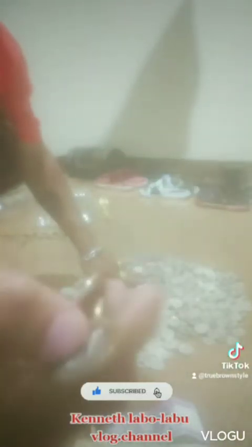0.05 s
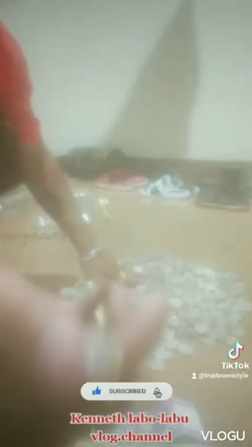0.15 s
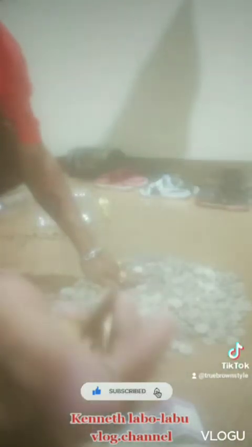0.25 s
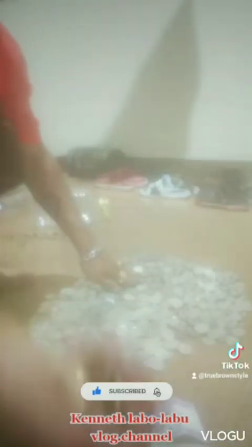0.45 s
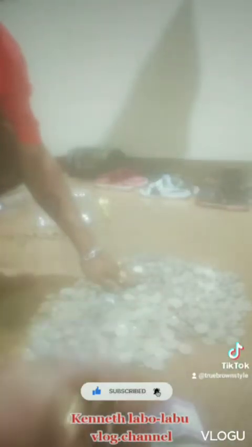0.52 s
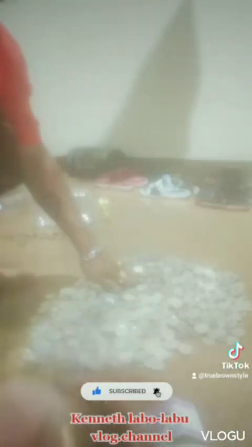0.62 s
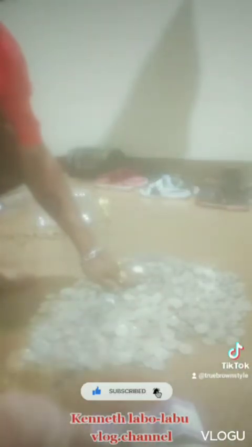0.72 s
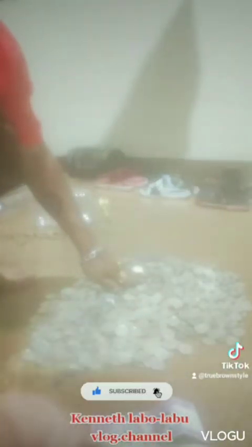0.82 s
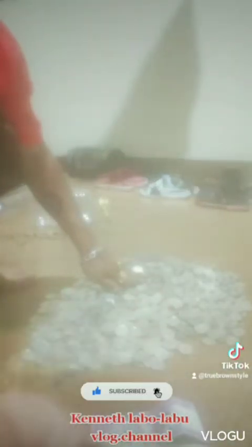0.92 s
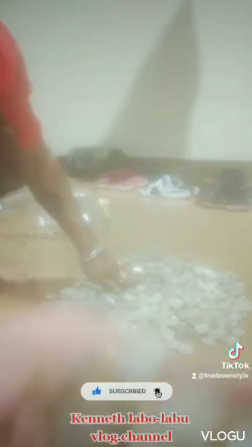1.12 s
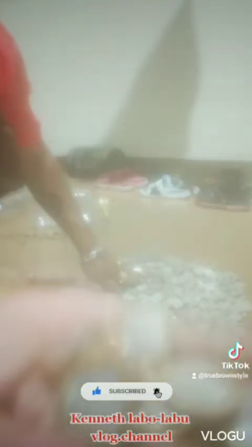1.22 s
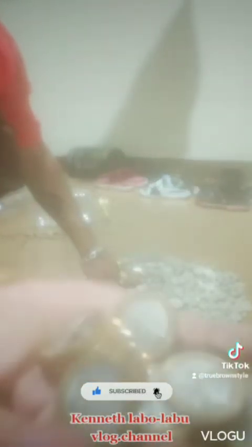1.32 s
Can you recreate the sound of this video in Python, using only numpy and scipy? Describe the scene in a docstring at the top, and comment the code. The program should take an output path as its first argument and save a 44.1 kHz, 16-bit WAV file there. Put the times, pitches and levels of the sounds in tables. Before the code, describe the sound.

Coins clink and slide as they drop onto a large heap in a quick, bright run. After a brief pause a few more land softly. The small room is heard close up, with a faint hiss.

```python
"""Coins dropped on a heap

Coins are picked from a large heap on the floor of a small hard room and let fall back onto it.
Each impact is a sharp tick that excites the damped modes of the coins around it. Sliding coins
chatter, loose coins ring in free vibration, and two landings thud faintly through the heap.
The room reverberates, and hums and hisses quietly."""
import sys
import numpy as np
from scipy import signal
from scipy.fft import rfft, irfft, next_fast_len
from scipy.io import wavfile

SR = 44100
rng = np.random.default_rng(int(sys.argv[2]) if len(sys.argv) > 2 else 0)


def log_audio(samples):
    """Write samples as a 16-bit WAV file to the path given in sys.argv[1]."""
    # one column per channel
    frames = np.atleast_2d(samples).T
    # limit to full scale, then quantise
    limited = np.clip(frames, -1, 1)
    pcm = np.round(limited * 32767).astype(np.int16)
    wavfile.write(sys.argv[1], SR, pcm)


N = 59535
TIME = np.arange(N) / SR
LOW_MID_HZ, TREBLE_HZ = (1320, 4060), 8370

# Impacts of coin on coin: t/s, level/dB, treble gain/dB, low-mid gain/dB, shaking of the heap/dB
IMPACTS = [ (0.195, -36, -5, 4, 6), (0.2328, -32, -1, -8, 9), (0.239, 1.5, -0.5, -11, -2),
           (0.2558, -9, 2.5, 0.5, 1), (0.2622, -8.5, -13, -4.5, 1.5), (0.2868, -13.5, -6, -1.5, -3),
           (0.3538, -21.5, -17, 7, -4.5), (0.3650, -17, -8, 3, 4.5), (0.3697, -18.5, -3, 2, 7.5),
           (0.3703, -8.5, 6, 12, -8), (0.3753, -7, 2.5, -10, 2.5), (0.3777, -8.5, 5.5, 10.5, 0.5),
           (0.3818, -2.5, 6, -2, -8), (0.39, -14.5, -3, 5.5, 2.5), (0.4437, -16, -5, 0, -1),
           (0.4466, -4.5, -1, -2.5, -1.5), (0.4553, -11.5, 0, -14, 4), (0.4611, -10, 4, 9, 4),
           (0.4649, -10, -1, 5.5, 3), (0.4701, -16.5, -4, -7, 10), (0.4754, -11.5, -8, 6.5, -2),
           (0.4937, -18, -4, 12, 0), (0.5, -11, 0, -1, -1), (0.5035, -6.5, 4, 6, -1),
           (0.5128, -8.5, 6, 5.5, 2.5), (0.5184, 1, 2, 0, 0.5), (0.5211, -1, 1, -0.5, 2.5),
           (0.5302, -17.5, 10, 5, 4), (0.5330, -8, 3, -3, 3.5), (0.5464, -12, -16, -6, 6.5),
           (0.5474, -6.5, 4, -13, -1.5), (0.5509, -3.5, -3.5, 0.5, 0), (0.5719, -23, 8, -13, 1),
           (0.5902, -23.5, 2, 14, -11), (0.6153, -17.5, -2, 4, -2.5), (0.6213, -16.5, -8, -7, 4.5),
           (0.629, -26, -3, 6, -1), (0.6350, -7.5, -9.5, -9, -1), (0.6636, 5, 6, 2, -9),
           (0.6750, -9, 13, 6, -3.5), (0.677, -15.5, 0, 8, 2), (0.6944, -13.5, -7, -4, 0.5),
           (0.722, -20.5, 2, -11, 0), (0.7393, -22.5, -8, -5.5, 3.5), (0.7537, -20, -21, -5, -8),
           (0.7696, -34.5, 0, -8, 8), (0.7998, -25, -15, -7, -1), (0.8464, -26, -4.5, -8, -1),
           (1.2614, -28, -23, -9, 7), (1.2664, -17.5, -23, -9, 2.5), (1.2715, -19, -9, -5, -2.5),
           (1.2841, -20, 2, -6, 0), (1.3052, -10.5, -15, -16, 4), (1.3156, -9, -5.5, -9, 4.5),
           (1.3348, -24.5, -1, -3, 4)]
# Coins sliding over one another: start/s, end/s, level/dB, low-mid gain/dB
SLIDES = [(0.362, 0.397, -20, 4), (0.458, 0.559, -17, 3.5), (0.59, 0.66, -34, 6.5), (0.692, 0.741, -37, -3),
          (1.26, 1.3, -38, 3)]
# Spectral envelope common to impacts and slides: f/Hz, gain/dB
CONTACT_SPECTRUM = [(200, -38), (700, -23.5), (1200, -19.5), (1600, -10), (2600, -5), (3600, -5.5),
                    (5500, -5.5), (6500, -0.5), (7400, 5), (8600, -6.5), (9900, -14.5), (11300, -2.5),
                    (13000, -4), (15300, -1.5)]
# Modes of freely ringing coins: f/Hz, relative level/dB, T60/s
SMALL_COIN = [(11100, -4, 0.25), (11233, 1, 0.14), (11240, -6, .22)]
LARGE_COIN = [(5830, 3, 0.12), (5660, 3, 0.08), (6580, -13, 0.1), (6580, 10.5, 0.13), (7387, -15, 0.12),
              (7350, -13, 0.11), (14600, -13, .1), (15100, -3, 0.11), (14600, 9.5, .12), (15000, 0, .12)]
# Modes of coins partly damped by fingers or neighbours: f/Hz, relative level/dB, T60/s
PINCHED_COIN = [(1605, -12.5, 0.07), (4400, -5, 0.059), (7360, 4.5, 0.061), (9650, -1.5, 0.039),
                (10800, 8.5, 0.018)]
TILTED_COIN = [(1980, -32, 0.21), (2590, -5, 0.16), (2775, -16, 0.087), (3240, -24, 0.23),
               (7250, -11, 0.098), (7415, -26, .07), (8100, 13, 0.043), (11200, -12, 0.056)]
SETTLING_COIN = [(2830, -3.5, 0.21), (4560, 5.5, .15), (4700, 0, 0.1), (4940, -2.5, 0.082), (6470, -3, .08)]
COIN_STACK = [(885, -9, 0.16), (1031, -4, 0.19), (1130, -5, 0.15), (1558, 3, 0.15), (1690, -8, 0.13)]
FAR_COIN = [(3950, 0.0066, 0.033)]
# Loose coins set ringing: t/s, table of modes, level/dB, treble gain/dB, time left free/s
FREE_VIBRATIONS = [ (0.2389, PINCHED_COIN, -33.5, 1, 0.01), (0.3758, TILTED_COIN, -39, -17, 0.049),
                   (0.457, SMALL_COIN, -36, -2, 0.019), (0.4609, TILTED_COIN, -51, -4, 0.032),
                   (0.481, SMALL_COIN, -40, -1, .014), (0.4940, LARGE_COIN, -44.5, -3, .05),
                   (0.5186, LARGE_COIN, -44, -7, 0.089), (0.4934, COIN_STACK, -54.5, 0, .03),
                   (0.519, COIN_STACK, -49, 0, 0.029), (0.5189, SETTLING_COIN, -45, 0, 0.056),
                   (0.5515, SMALL_COIN, -45.5, -2.5, 0.027), (0.5902, SMALL_COIN, -56.5, -3, .02),
                   (0.6235, SMALL_COIN, -47.5, -2.5, 0.047), (0.6649, SMALL_COIN, -26.5, 0.5, 0.0064),
                   (0.6810, SMALL_COIN, -40, 0, 0.11), (0.7222, SETTLING_COIN, -58.5, 0, 0.019),
                   (0.846, SETTLING_COIN, -70.5, -6, 0.0071), (0.9100, FAR_COIN, -61, -3, .004),
                   (1.2727, SMALL_COIN, -60, -4, 0.049), (1.3145, SMALL_COIN, -50.5, -2, .04),
                   (1.3165, SETTLING_COIN, -57, 0, 0.014), (1.3157, TILTED_COIN, -57.5, -8, 0.013)]
# Landings that thud through the heap: t/s, impulse level/dB
LANDINGS = [(0.2391, -25), (0.6639, -12)]
# Early reflections from floor and walls: delay/s, gain/dB
REFLECTIONS = [(.0018, -18), (.0034, -18)]
# Faint low swells in the room: time of peak/s, half-length/s, f/Hz, level/dB
SWELLS = [(0.509, 0.15, 197.5, -56), (0.546, 0.15, 397, -64.5), (0.628, 0.042, 80, -51),
          (1.13, 0.08, 363, -65.5)]
# Spectrum of the background noise: f/Hz, relative spectral density/dB
NOISE_SPECTRUM = [(25, -2), (43, -11.5), (70, 2.5), (110, -9), (170, -4.5), (290, -16.5), (400, -15),
                  (760, -11.5), (1600, -14), (2600, -19.5), (3600, -26), (5500, -28.5), (7100, -15),
                  (8500, -28.5), (10000, -28), (12000, -28), (15500, -25.5)]
# Hums of the room: f/Hz, bandwidth/Hz, level/dB
HUMS = [(74.1, 9.1, -73.5), (199.1, 10.3, -75.5), (363.6, 18, -85.5), (733, 21.5, -78)]


def contact(heap_db, mode_count=80, median_t60_s=0.022):
    """Impulse response of the heap: a tick and the densely spaced, damped modes of nearby coins."""
    t = TIME[:SR // 16]
    hz = np.linspace(300, 16000, mode_count) + rng.uniform(-90, 90, mode_count)
    t60 = median_t60_s * np.exp(0.53 * rng.standard_normal(mode_count))
    phase = rng.uniform(0, 2 * np.pi, mode_count)
    modes = np.sin(2 * np.pi * hz[:, None] * t + phase[:, None]) * decay(t, t60[:, None])
    sound = from_db(heap_db - 1.5) * unit_energy(modes.sum(axis=0))
    sound[4] += from_db(-4.5)  # the tick
    return sound


def impacts():
    """Impact excitation: each collision shakes the heap with its own strength and spectrum."""
    out = np.zeros(N)
    for s, db, treble_db, low_mid_db, heap_db in IMPACTS:
        add(out, s, from_db(db) * band_gains(contact(heap_db), treble_db, low_mid_db))
    return out


def slides(slips_per_s=410, spots=4, spread_db=6):
    """Stick-slip friction: tiny random slips excite a few spots in a run that swells and fades."""
    out = np.zeros(N)
    for start, end, db, low_mid_db in SLIDES:
        t = TIME[:int((end - start) * SR)]
        swell = from_db(db) * np.sqrt(np.abs(np.sin(np.pi * t / (end - start))))
        chance, size = rng.random((2, spots, N))[:, :, :len(t)]
        slipping = chance < slips_per_s / spots / SR
        for slips in slipping * from_db(spread_db * size) * swell:
            response = band_gains(contact(heap_db=0), treble_db=-4, low_mid_db=low_mid_db)
            add(out, start, signal.fftconvolve(slips, response))
    return out


def loose_coins(choke_t60_s=0.015):
    """Free vibration: a coin rings in its normal modes until a landing or a touch damps it."""
    out = np.zeros(N)
    t = TIME[:SR // 2]
    for s, modes, db, treble_db, free_s in FREE_VIBRATIONS:
        choke = decay(np.maximum(t - free_s, 0), choke_t60_s)
        for hz, mode_db, t60 in modes:
            # A softer touch excites less treble.
            amplitude = from_db(db + mode_db + treble_db * (hz > TREBLE_HZ))
            add(out, s, amplitude * np.sin(2 * np.pi * hz * t) * decay(t, t60) * choke)
    return out


def thuds():
    """Momentum transfer: a landing coin gives the heap a dull push, a band-limited impulse."""
    pushes = np.zeros(N)
    for s, db in LANDINGS:
        add(pushes, s, -from_db([db]))
    return butter(butter(pushes, 110, "high", order=1), 3100, "low")


def reverberation(x, low_t60_s=0.29, treble_t60_s=0.17, crossover_hz=5700, build_s=0.0073):
    """Reflection and absorption: early echoes, then a diffuse field whose treble dies first."""
    t = TIME[:SR // 2]
    low = butter(rng.standard_normal(len(t)), crossover_hz, "low") * decay(t, low_t60_s)
    treble = butter(rng.standard_normal(len(t)), crossover_hz, "high") * decay(t, treble_t60_s)
    build_up = 1 - np.exp(-t / build_s)
    response = from_db(-13.5) * unit_energy((low + treble) * build_up)
    for delay, db in REFLECTIONS:
        add(response, delay, from_db([db]))
    return signal.fftconvolve(x, response)[:N]


def low_swells():
    """Amplitude modulation: soft low tones rise and fall under bell-shaped envelopes."""
    out = np.zeros(N)
    for peak_s, half_length_s, hz, db in SWELLS:
        envelope = np.cos(np.pi / 2 * np.clip((TIME - peak_s) / half_length_s, -1, 1)) ** 4
        out += from_db(db) * envelope * np.sin(2 * np.pi * hz * TIME)
    return out


def background():
    """Stationary noise: a broad band is heard as hiss and rumble, narrow bands as wavering hums."""
    out = from_db(-60) * unit_rms(coloured(rng.standard_normal(N), NOISE_SPECTRUM))
    for hz, width, db in HUMS:
        hum = butter(rng.standard_normal(2 * N), [hz - width / 2, hz + width / 2], "band")
        out += from_db(db) * unit_rms(hum[N:])  # steady state only
    return out


def coloured(x, points):
    """Minimum-phase filtering: a causal response whose gain follows a table of f/Hz, gain/dB."""
    size = next_fast_len(2 * N)
    hz, db = np.transpose(points)
    bin_hz = np.fft.rfftfreq(size, 1 / SR)
    gain = from_db(np.interp(np.log(bin_hz + 1), np.log(hz), db))
    cepstrum = irfft(np.log(gain), size)
    # Folding the cepstrum onto positive time makes the filter causal.
    cepstrum[1:size // 2] *= 2
    cepstrum[size // 2 + 1:] = 0
    return irfft(rfft(x, size) * np.exp(rfft(cepstrum)), size)[:N]


def band_gains(x, treble_db, low_mid_db):
    """Zero-phase equalisation: a treble shelf and a low-mid band are raised or lowered."""
    size = 2 * len(x)
    hz = np.fft.rfftfreq(size, 1 / SR)
    treble = 1 - 1 / (1 + (hz / TREBLE_HZ) ** 10)
    low_mid = 1 / (1 + (hz / LOW_MID_HZ[1]) ** 6) - 1 / (1 + (hz / LOW_MID_HZ[0]) ** 6)
    gain = from_db(treble_db * treble + low_mid_db * low_mid)
    return irfft(rfft(x, size) * gain)[:len(x)]


def butter(x, hz, kind, order=2):
    """Butterworth filtering: causal, with a maximally flat passband."""
    return signal.sosfilt(signal.butter(order, hz, kind, fs=SR, output="sos"), x)


def decay(t, t60):
    """Exponential damping: the level falls 60 dB in t60 seconds."""
    return np.exp(-np.log(1000) * t / t60)


def from_db(db):
    """Amplitude ratio of a level in decibels."""
    return 10 ** (np.asarray(db) / 20)


def unit_rms(x):
    """Normalisation to an rms of 1."""
    return x / np.sqrt(np.mean(x ** 2) + 1e-20)


def unit_energy(x):
    """Normalisation to an energy of 1."""
    return x / np.sqrt(np.sum(x ** 2) + 1e-20)


def add(track, s, sound):
    """Superposition of a sound on a track, starting at s seconds."""
    start = int(s * SR)
    track[start:start + len(sound)] += sound[:N - start]


def scene():
    """Superposition: the direct sound of the coins, its reflections and the background."""
    clatter = coloured(impacts() + slides(), CONTACT_SPECTRUM)
    ringing = loose_coins()
    reflected = reverberation(clatter + from_db(-8.5) * ringing)
    return (clatter + ringing + reflected + thuds() + low_swells() + background())[None]


def record(dry):
    """Band limiting: a steep elliptic low-pass removes the highest treble."""
    low_pass = signal.ellip(10, .3, 70, 15450, fs=SR, output="sos")
    return signal.sosfilt(low_pass, dry)


dry = scene()
out = record(dry)
log_audio(out)
```